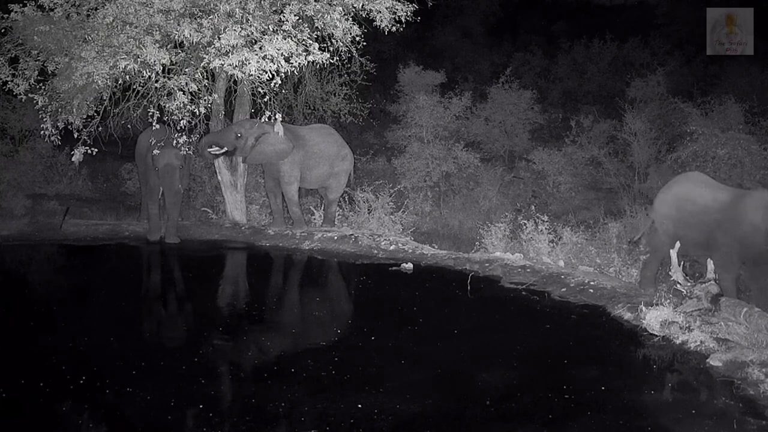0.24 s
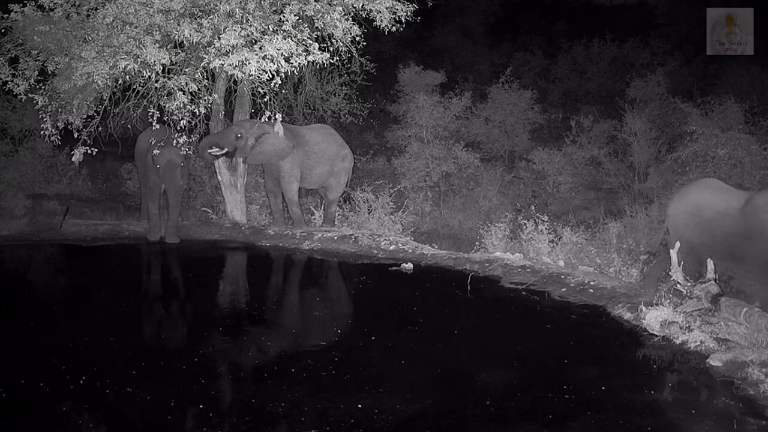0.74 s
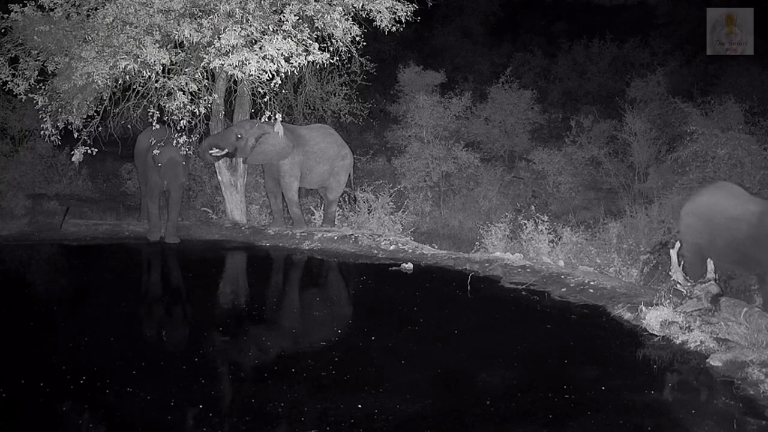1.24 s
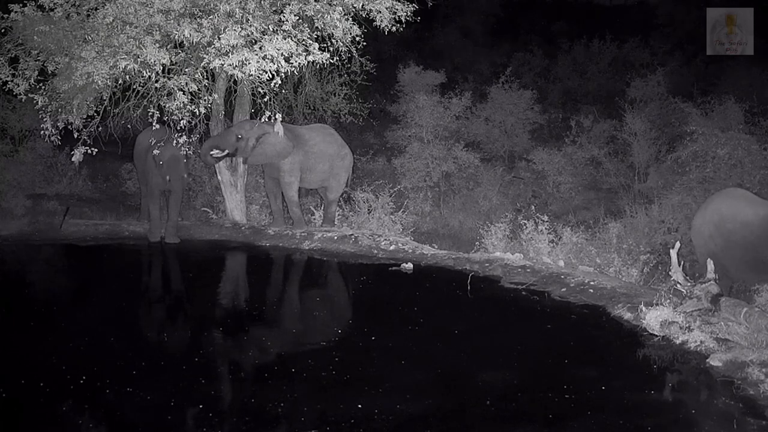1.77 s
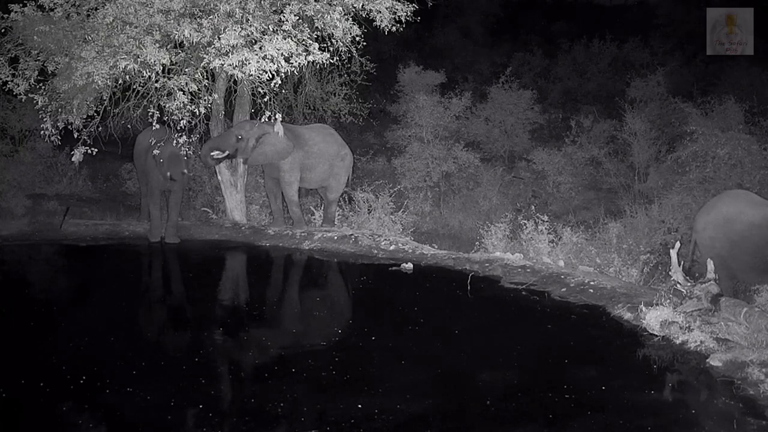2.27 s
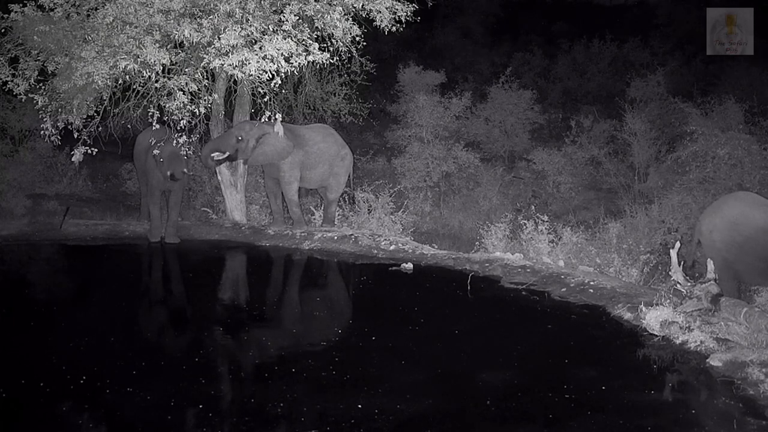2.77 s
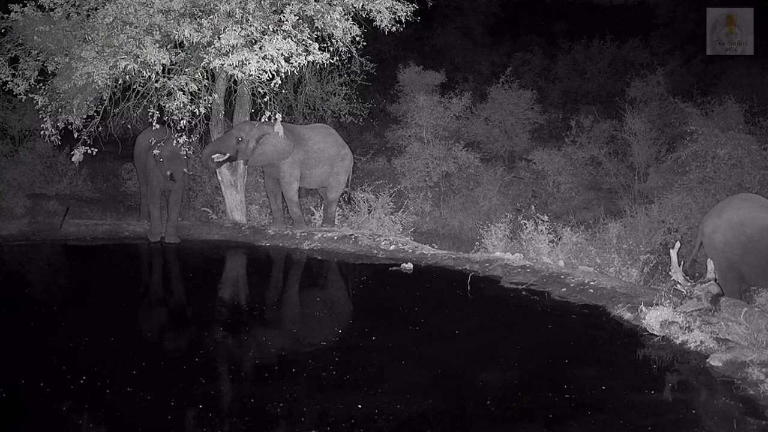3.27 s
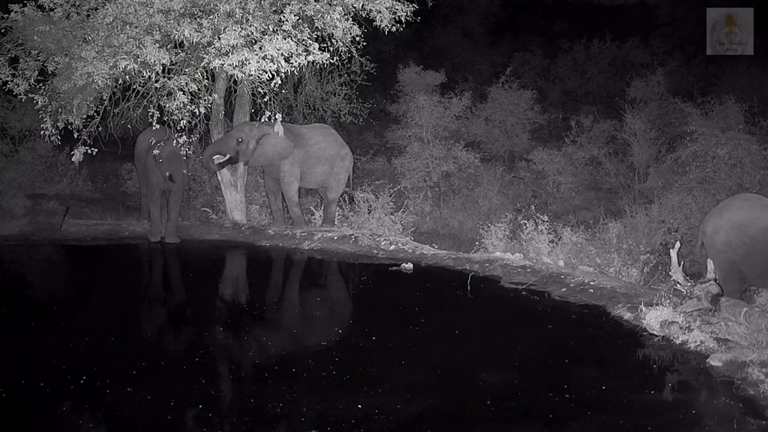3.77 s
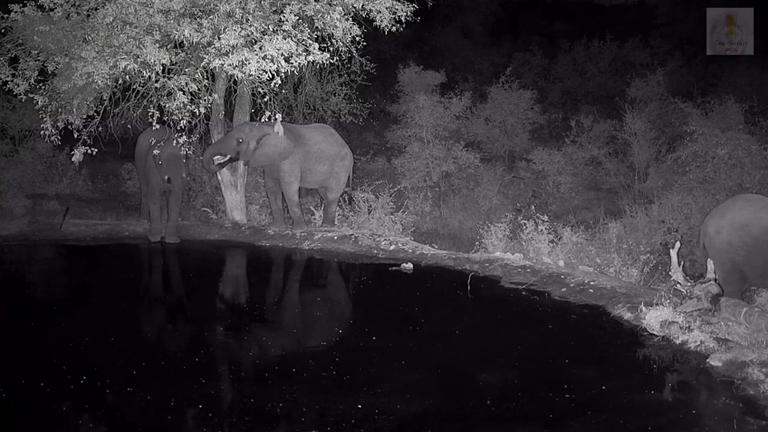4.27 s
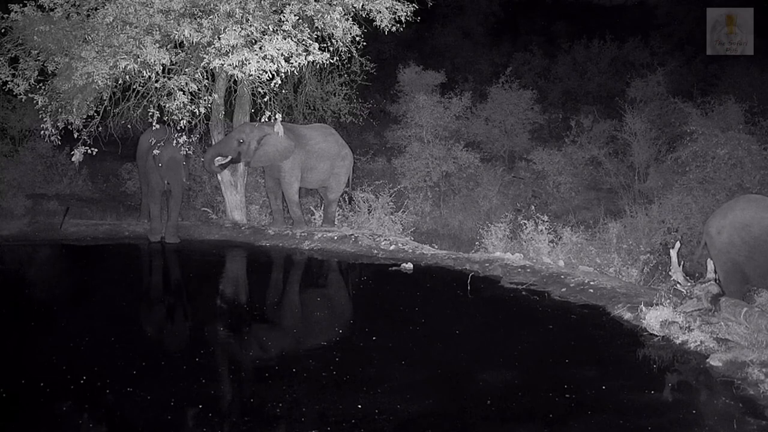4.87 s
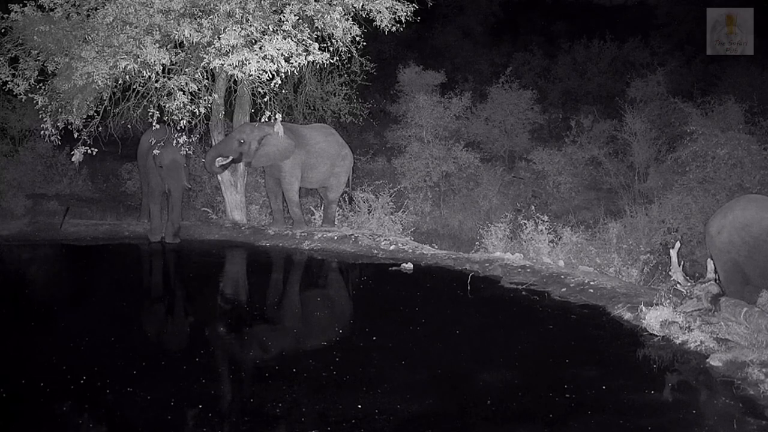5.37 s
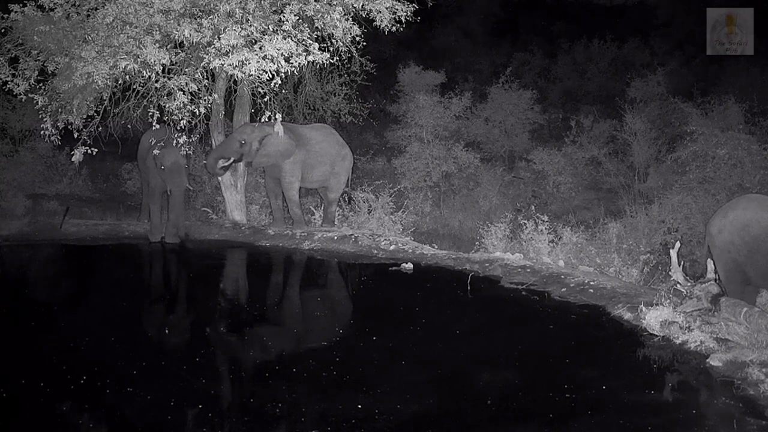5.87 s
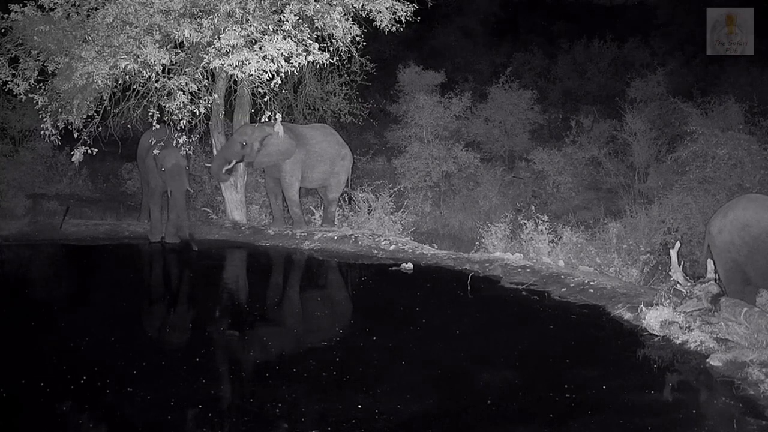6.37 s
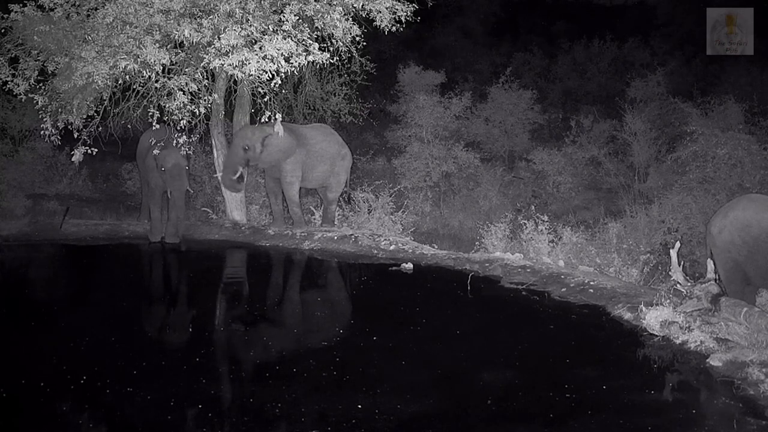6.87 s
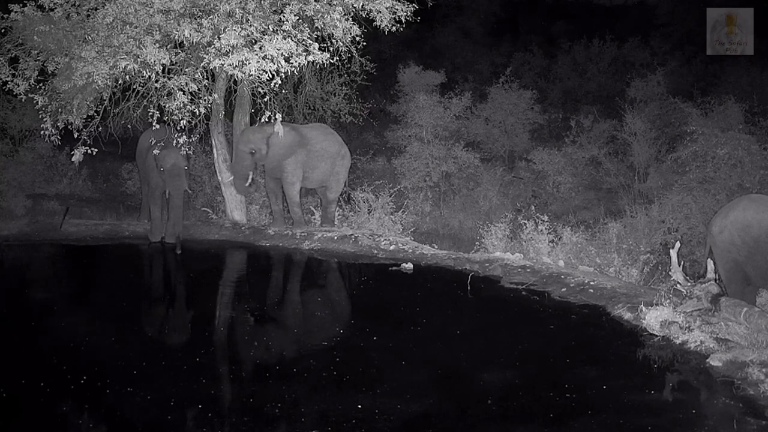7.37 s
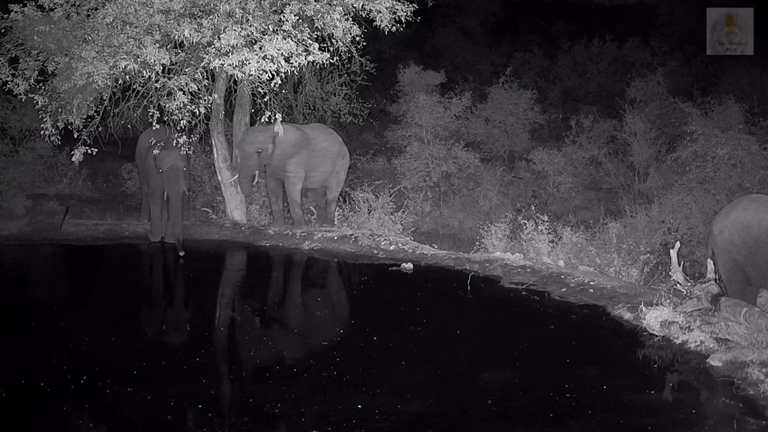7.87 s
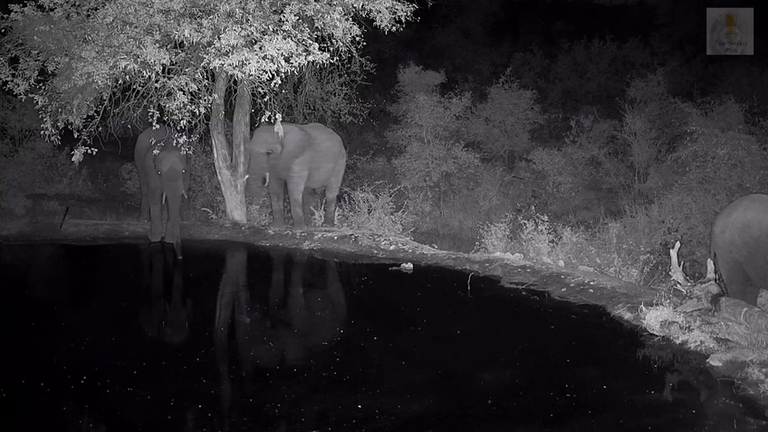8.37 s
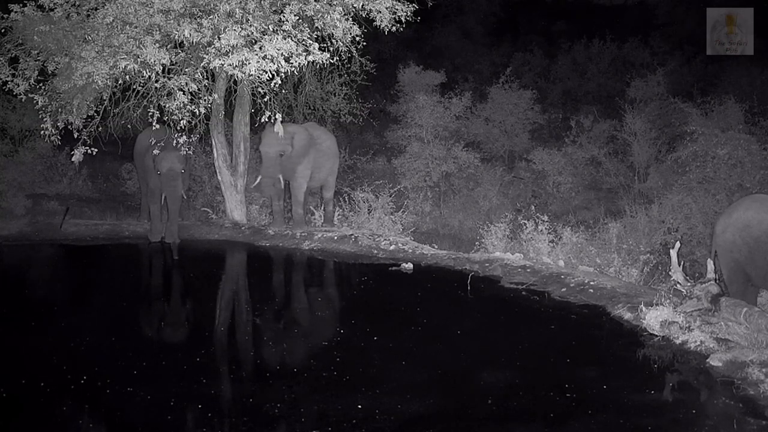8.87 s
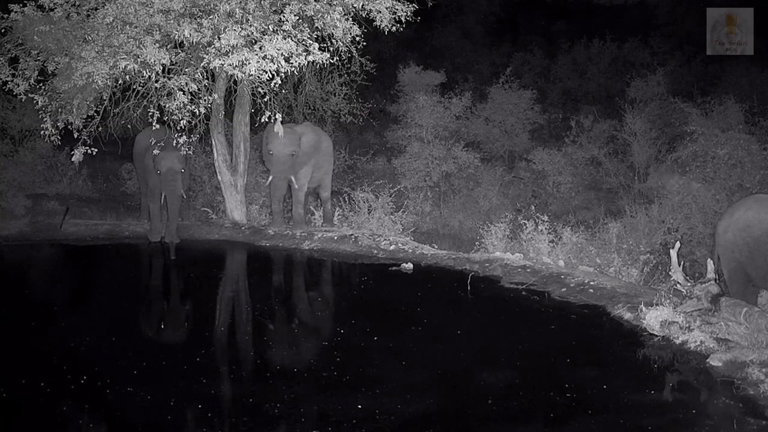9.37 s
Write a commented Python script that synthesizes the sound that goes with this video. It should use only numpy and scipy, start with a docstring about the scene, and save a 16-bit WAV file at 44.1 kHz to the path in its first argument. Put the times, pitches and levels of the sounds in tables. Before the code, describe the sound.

At a quiet waterhole at night, elephants splash and squirt water into their mouths, the flow fading to scattered drops and bubbly glugs.

```python
"""Water slaps and pours from an elephant's trunk into a night waterhole, then thins out to drips and glugs. It
is heard outdoors from one fixed spot; twice a trunkful is squirted into a hollow mouth. Rains of small bubbles
and noise make the stream; single bubbles with cracks make drops and slaps, and bare ringing bubbles make
plinks. Noise through moving resonances makes the squirts; behind lie echoes off the bank, a trilling frog, an
insect, a faint electric hum and the hiss of the air."""
import sys
import numpy as np
from scipy import signal
from scipy.fft import rfft, irfft
from scipy.io import wavfile

SR = 44100
rng = np.random.default_rng(int(sys.argv[2]) if len(sys.argv) > 2 else 0)


def dump_mix(stems):
    """Bounce the given channels to the path in sys.argv[1] as a 16-bit WAV at rate SR."""
    frames = np.atleast_2d(stems).T  # one column per channel
    limited = np.clip(frames, -1, 1)  # hard clip at full scale
    pcm = np.round(limited * 32767).astype(np.int16)
    wavfile.write(sys.argv[1], SR, pcm)


N = 424241
TIME = np.arange(N) / SR  # seconds


def gain_of(db):
    """Decibels to amplitude."""
    return 10 ** (np.asarray(db) / 20)


def evened(x):
    """Scales to rms 1."""
    return x / np.sqrt(np.mean(x ** 2) + 1e-20)


def add(mix, s, sound):
    """Mixes a sound in at time s, in seconds."""
    part = mix[max(round(s * SR), 0):][:len(sound)]
    part += sound[:len(part)]


def coloured(x, points):
    """Filters by a curve of (Hz, dB) points, joined along a logarithmic pitch axis."""
    hz, db = np.transpose(points)
    f = np.fft.rfftfreq(len(x), 1 / SR)
    gain = gain_of(np.interp(np.log(f + 1), np.log(hz), db))
    return irfft(rfft(x) * gain, len(x))


def wander(per_s):
    """Straight lines between random values, per_s of them a second, at rms 1."""
    knots = np.arange(0, TIME[-1] + 1, 1 / per_s)
    return evened(np.interp(TIME, knots, rng.standard_normal(len(knots))))


def resonate(x, hz, width):
    """A resonance of gain 1 that can follow a pitch curve: shift to zero, smooth, shift back."""
    turn = np.exp(2j * np.pi * np.cumsum(hz * np.ones(len(x))) / SR)
    r = np.exp(-np.pi * width / SR)
    smooth = signal.lfilter([1 - r], [1, -r], x / turn + 1e-18)
    return 2 * (turn * smooth).real


def night():
    """A pulsing frog, a thin insect, mains hum and the hiss of the air."""
    # Frog trills. Each row: start in seconds, level in dB before its flutter.
    trills = [(6.11, -43), (6.57, -40.5), (6.97, -43.5), (7.38, -43), (8.28, -42.5), (8.79, -41.5),
              (9.24, -41.5)]
    # Colour of still night air. Each row: frequency in Hz, relative level in dB per Hz.
    air_colour = [(25, -4), (100, -7), (220, 5), (600, 0), (1150, 6.5), (1700, 1.5), (4000, -8),
                  (6500, -7.5), (16000, -22)]
    trill_s, pulses_per_s = 0.34, 32.5
    frog = np.zeros(N)
    t = np.arange(0, trill_s, 1 / SR)
    pulse = t * pulses_per_s % 1
    for start, db in trills:
        # every pulse swells and dies while its pitch falls
        note = np.sin(2 * np.pi * np.cumsum(2150 - 70 * pulse) / SR) * np.sin(np.pi * pulse)
        flutter = gain_of(1.9 * wander(27)[:len(t)])
        add(frog, start, gain_of(db) * note * signal.windows.tukey(len(t), .25) * flutter)
    strokes = np.sin(np.pi * 30 * TIME) ** 2  # 30 a second
    tone = np.sin(2 * np.pi * np.cumsum(3560 + 45 * wander(130)) / SR)
    insect = tone * strokes * gain_of(1.5 * wander(2.04))
    hum = gain_of(-66) * np.sin(2 * np.pi * 100 * TIME)
    air = evened(coloured(rng.standard_normal(N), air_colour))
    return frog + gain_of(-51) * insect + hum + gain_of(-52.5) * air


def bank(x, t60_s=0.18, count=6):
    """The far bank and trees return a thin, short tail: random tails take turns, so no fixed ringing builds up."""
    t, out = TIME[:SR // 2], np.zeros(N)
    for k in range(count):
        tail = rng.standard_normal(len(t)) * gain_of(-60 * t / t60_s) * (t > .008)
        tail = coloured(tail, [(200, 1.5), (1100, -2.0), (3000, -6.5), (8000, -4.0)])
        # the tails take turns of 0.2 s that overlap by half
        turn = np.minimum((10 * TIME - k) % count, 2)
        out += signal.oaconvolve(x * np.sin(np.pi / 2 * turn), tail / np.linalg.norm(tail))[:N]
    return out


def scattered(sound, echo_db, decay_s, count=14):
    """Follows a sound with a handful of weak, close reflections off water, bank and bodies."""
    delay = rng.uniform(0.0031, 0.03, count)
    size = gain_of(echo_db) * np.exp(-delay / decay_s) * rng.choice([-1, 1], count)
    taps = np.bincount((delay * SR).astype(int), size)
    taps[0] += 1  # the direct sound
    return signal.fftconvolve(sound, taps)


def bubble(hz, cycles, rise):
    """A pocket of air swells into ringing, then dies while its pitch creeps up."""
    turns = np.arange(int(10 * cycles * SR / hz) + 2) * hz / SR
    age = turns / cycles
    return age * np.exp(1 - age) * np.sin(2 * np.pi * turns * (1 + rise * age))


def spray(decay_s):
    """A crack of water on water: coloured noise that dies away at once."""
    # Colour of the crack. Each row: frequency in Hz, gain in dB.
    crack_colour = [(200, 6), (900, -28), (3500, 14.5), (7000, -2.5), (16000, 4)]
    return coloured(rng.standard_normal(4096) * np.exp(-TIME[:4096] / decay_s), crack_colour)


def splash(hz, cycles, trail_db, trail_s, count=40):
    """A bubble with a crack, louder for high ones, then a wet cluster of bubbles as the water falls back."""
    out = np.zeros(SR // 5)
    add(out, 0, bubble(hz, cycles, 0.003))
    add(out, 0, gain_of(-10.5) * (hz / 4000) ** 1.5 * spray(0.00077))
    delays = 0.002 + 4 * trail_s * (np.arange(count) + rng.random(count)) / count
    detunes, signs = rng.uniform(-0.41, 0.38, count), rng.choice([-1, 1], count)
    for late, detune, sign in zip(delays, detunes, signs):
        ring = bubble(hz * np.exp(detune), 1.3, .02)
        add(out, late, gain_of(trail_db - 4.5) * sign * np.exp(-late / trail_s) * ring)
    return signal.lfilter(*signal.butter(1, hz / 2, "high", fs=SR), out)


def water_levels():
    """Churn and spatter in dB: the stream, plus sloshes that rise, hold and die away."""
    # The stream from a trunk swells a few times and thins to a trickle.
    # Each row: time in seconds, spatter level in dB.
    stream = [(0, -23.5), (.5, -27), (.75, -22), (1.4, -25.5), (1.58, -22), (2.0, -27), (2.28, -22),
              (2.63, -29.5), (2.98, -28), (3.68, -34.5), (4.8, -36), (5.5, -37), (6.05, -44), (6.22, -47),
              (7.8, -40.5), (9.05, -48.5), (9.55, -52.5)]
    # Sloshes, when a trunk stirs the pool or spills a mouthful.
    # Each row: start in seconds, seconds until the release, churn level in dB, spatter level in dB.
    sloshes = [(0.0, 0.31, -24.5, -41), (0.712, 0.087, -20, -35), (3.8, 0.065, -29.5, -42),
               (4.915, 0.042, -26.5, -35), (5.72, 0.15, -38, -41.5), (5.959, 0.18, -40.5, -38.5),
               (6.568, 0.1, -39, -43.5), (6.941, 0.2, -38.5, -57), (7.715, 0.19, -39, -40),
               (8.633, 0.038, -57, -37.5)]
    attack_s, release_s = 0.016, 0.01
    stream_db = np.interp(TIME, *np.transpose(stream))
    # a strong stream digs into the pool: its churn grows faster than its spatter
    churn = gain_of(-19.5 + 1.304 * (stream_db + 22)) ** 2
    spatter = gain_of(stream_db) ** 2
    t = TIME[:SR // 2]
    for s, length, churn_db, spatter_db in sloshes:
        shape = np.minimum(t / attack_s, 1) * np.exp(-np.maximum(t - length, 0) / release_s)
        add(churn, s, (gain_of(churn_db) * shape) ** 2)
        add(spatter, s, (gain_of(spatter_db) * shape) ** 2)
    return 10 * np.log10(churn), 10 * np.log10(spatter)


def blips(churn_db, per_s=28, cycles=6, rise=0.023, spread_db=7, ceiling_db=-22):
    """Now and then a bubble in the churned pool rings on longer, as a small rising blip."""
    out = np.zeros(N)
    for when, pitch, size in rng.random((int(per_s * N / SR), 3)):
        db = min(churn_db[int(when * N)] + spread_db * size ** 2, ceiling_db)
        add(out, when * N / SR, gain_of(db) * bubble(900 * 3.2 ** pitch, cycles, rise))
    return out


def dribble(spatter_db, per_s=30, ceiling_db=-23, ring_s=.00025):
    """Lesser drops, mostly high in pitch and few large, fall from trunks and lips in step with the spatter."""
    out = np.zeros(N)
    for when, pitch, size in rng.random((int(per_s * N / SR), 3)):
        db = min(spatter_db[int(when * N)] + 4 + 12 * size ** 2, ceiling_db)
        hz = 900 * 6 ** np.sqrt(pitch)
        drop = splash(hz, cycles=1 + ring_s * hz, trail_db=-4, trail_s=0.0082, count=16)
        add(out, when * N / SR, gain_of(db) * drop)
    return out


def gurgles():
    """Churning water rings a large, shapeless hollow for a moment: noise through a broad resonance."""
    # Where water closes over a trunk or swirls in a mouth.
    # Each row: start in seconds, length in seconds, level in dB, pitch in Hz.
    hollows = [(2.645, 0.064, -40.5, 286), (3.135, 0.088, -36.5, 442), (5.129, 0.12, -31, 1130),
               (5.729, 0.075, -38.5, 332), (6.588, 0.14, -47.5, 396), (8.052, 0.042, -43.5, 338),
               (8.798, 0.076, -47.5, 290)]
    width_hz = 290  # of each of two passes
    out = np.zeros(N)
    for s, length, db, hz in hollows:
        stir = rng.standard_normal(int(length * SR))
        ring = evened(resonate(resonate(stir, hz, width_hz), hz, width_hz))
        add(out, s, gain_of(db) * ring * signal.windows.tukey(len(ring), .6))
    return out


def plinks():
    """A freed bubble rings for a few hundredths of a second, creeping up in pitch."""
    # Bubbles that break free. Each row: start in seconds, level in dB, starting pitch in Hz.
    freed = [(3.145, -20.5, 663), (3.603, -28.5, 717), (3.918, -28, 643), (4.578, -35, 590),
             (4.945, -25, 220), (5.035, -33.5, 204), (5.815, -22.5, 1125), (5.968, -22, 1214),
             (5.99, -18, 1100), (6.023, -22, 1075), (6.957, -34, 587), (6.99, -28.5, 540),
             (7.122, -33, 650), (7.756, -35, 570), (8.26, -16.5, 1240), (8.96, -22, 1207),
             (9.004, -28, 1045), (9.209, -33.5, 1156)]
    out = np.zeros(N)
    for s, db, hz in freed:
        ring = bubble(hz, cycles=4, rise=.006)
        add(out, s, gain_of(db) * scattered(ring, echo_db=-16, decay_s=.025))
    return out


def glugs():
    """A large bubble swells, glides upward as it nears the surface and leaves smaller ones ringing behind."""
    # Big rising bubbles.
    # Each row: start in seconds, level in dB, first pitch in Hz, last pitch in Hz, length in seconds.
    risers = [(3.155, -28, 323, 414, 0.035), (3.208, -25, 850, 1270, 0.025),
              (3.323, -28, 714, 1040, 0.0096), (3.835, -23.5, 700, 1263, .032),
              (4.627, -22, 723, 761, 0.023), (5.79, -26, 418, 1126, 0.026), (6.072, -25, 604, 700, 0.015),
              (6.067, -30, 320, 442, 0.025), (6.4, -35.5, 920, 1044, 0.019),
              (6.672, -21.5, 450, 1310, 0.021), (6.742, -27, 505, 1120, 0.018),
              (6.994, -33.5, 560, 1400, 0.025), (7.205, -27, 570, 747, 0.017),
              (7.402, -16, 467, 1200, .025), (7.509, -25.5, 300, 785, 0.021),
              (7.901, -29.5, 534, 1135, 0.04), (8.177, -26, 1000, 1740, 0.018),
              (8.249, -27, 440, 964, 0.016), (8.485, -29, 398, 1420, 0.021), (8.85, -30, 700, 1390, 0.0197)]
    out = np.zeros(N)
    for s, db, first_hz, last_hz, length in risers:
        u = np.arange(0, 1, 1 / (length * SR))
        hz = first_hz + (last_hz - first_hz) * np.sin(np.pi / 2 * u)
        tone = np.sin(2 * np.pi * np.cumsum(hz) / SR) * np.sin(np.pi * u)
        add(out, s, gain_of(db) * scattered(tone, echo_db=-11, decay_s=.025))
        wake = splash(last_hz, cycles=1.5, trail_db=1, trail_s=.016)
        add(out, s + length / 2, gain_of(db - 10) * wake)
        add(out, s + length / 2, gain_of(db - 24.5) * spray(0.0067))
    return out


def drops():
    """Single heavy drops smack the surface and throw up a little spray."""
    # Each row: start in seconds, level in dB ahead of the offsets below, pitch in Hz.
    smacks = [(0.188, -4, 3100), (0.198, -5, 4440), (.344, -10, 2740), (.471, -9, 2650), (0.798, -3, 3100),
              (0.872, -9, 4400), (1.67, -8, 4300), (2.2515, -6, 2900), (2.6984, -9, 3820),
              (3.098, -14, 3700), (3.749, -11.5, 2970), (3.928, -18.5, 3700), (4.021, -15, 2730),
              (4.052, -17, 2900), (4.2177, -12.5, 2550), (4.434, -16, 4000), (4.7195, -16, 4100),
              (4.801, -19.5, 3580), (4.9765, -19, 3660), (5.004, -16, 4270), (5.7433, -19, 4390),
              (5.981, -22, 5780), (6.298, -29, 4540), (6.382, -29, 6000), (6.6295, -24, 4400),
              (6.777, -28, 5000), (6.992, -25, 3830), (7.5885, -27, 4660), (7.823, -24, 2800),
              (7.9415, -24, 4190), (8.1985, -27, 5000), (8.5655, -25, 3900), (9.122, -27, 4050)]
    out = np.zeros(N)
    for s, db, hz in smacks:
        add(out, s, gain_of(db + 2.0) * splash(hz, cycles=1.5, trail_db=-4, trail_s=0.008))
        add(out, s, gain_of(db - 18.0) * spray(0.0099))
    return out


def slaps():
    """A lump of water rings a short, deep bubble and breaks into smaller ones."""
    # Lumps that trap a pocket of air. Each row: start in seconds, level in dB, pitch in Hz,
    # trailing bubbles in dB relative to the lump (ahead of the offset and decay in splash).
    lumps = [(0.0893, 0, 1100, -14), (.107, -1, 1230, -3), (1.086, -5, 1130, 0), (1.741, -10, 620, -14),
             (1.8645, -1, 2900, -7), (1.901, -1, 1830, -14), (2.747, 1, 1900, -8), (2.824, -10, 1390, -13),
             (2.989, -4, 1900, -12), (3.082, -4, 1650, -9), (3.256, -7, 1030, -8), (3.391, -6.5, 1500, -14),
             (3.323, -13, 1200, 0), (3.552, -11, 1450, -7), (3.586, -18, 1000, 0), (4.202, -18, 760, -8),
             (4.227, -16, 1000, -4), (4.472, -14, 1230, -5), (4.5146, 3, 1750, -5), (4.699, -15, 1150, -5),
             (6.829, -20, 1230, -2), (6.867, -22, 1500, -7), (7.077, -15, 1150, -5), (7.183, -26, 1250, -4),
             (7.219, -12, 1600, -5), (7.516, -17, 1600, -3), (7.541, -15.5, 1540, -12),
             (8.014, -20, 1600, -10), (8.064, -7, 1270, 0), (8.118, -22, 1200, -2), (8.148, -21, 1500, 1),
             (8.258, -7.5, 950, -7), (8.384, -16, 900, -5), (8.863, -24, 1400, 2), (8.933, -5, 1900, -8),
             (9.047, -24, 1780, -4), (9.574, -29, 1430, 0)]
    out = np.zeros(N)
    for s, db, hz, trail_db in lumps:
        add(out, s, gain_of(db) * splash(hz, cycles=0.71, trail_db=trail_db, trail_s=0.015))
        add(out, s, gain_of(db - 32) * spray(0.0035))
    return out


def squirts():
    """The jet from the trunk bursts into the mouth, then sputters and fades in a cavity whose pitch sinks."""
    # A trunk emptied into the mouth. Each row: start in seconds, length in seconds, level in dB before
    # the fade, drone fade in dB per second, first cavity pitch in Hz, low gush level in dB,
    # gush length in seconds, high gush in dB relative to the low.
    trunkfuls = [(.707, 1.55, -32, 10, 266.3, -31, 0.11, 15.5),
                 (4.884, 1.22, -38, 21.5, 213, -31, 0.072, -9)]
    # Upper resonances of the mouth. Each row: frequency in Hz, width in Hz of the first pass
    # (the second is twice as wide), level in dB relative to the others.
    mouth = [(363, 46, -6), (643, 245, 1.5), (1130, 120, 6), (1383, 170, 9), (2500, 530, 2.5)]
    sag_hz_per_s = 14.4  # the cavity's pitch sinks as the jet loses pressure
    sputter_db, sputter_per_s = 2.5, 24
    cavity_wobble, lip_glide = 0.048, 0.046  # rms shares of the pitch; the lips work
    hollow_db, hollow_fade_share = -2.5, 0.64  # the upper resonances outlast the drone
    out = np.zeros(N)
    for s, length, db, fade_db_per_s, hz, gush_db, gush_s, bright_db in trunkfuls:
        t = TIME[:int(length * SR)]
        jet = rng.standard_normal(len(t))
        wobble = 1 + cavity_wobble * wander(sputter_per_s)[:len(t)]
        pitch = (hz - sag_hz_per_s * t) * wobble
        drone = evened(resonate(resonate(jet, pitch, 46), pitch, 46))
        lips = 1 + lip_glide * wander(9.33)[:len(t)]
        hollow = np.zeros(len(t))
        for f, width, level in mouth:
            ringing = resonate(resonate(jet, f * lips, width), f * lips, 2 * width)
            hollow += gain_of(level) * evened(ringing)
        pressure = gain_of(db + sputter_db * wander(sputter_per_s)[:len(t)])
        ring = drone * gain_of(-fade_db_per_s * t)
        ring += hollow * gain_of(hollow_db - hollow_fade_share * fade_db_per_s * t)
        add(out, s, pressure * ring * signal.windows.tukey(len(t), .05))
        gush = rng.standard_normal(int(gush_s * SR))
        low = evened(resonate(resonate(gush, 345, 74), 345, 74))
        high = evened(resonate(resonate(gush, 850, 460), 850, 460))
        burst = low + gain_of(bright_db) * high
        add(out, s, gain_of(gush_db) * burst * signal.windows.tukey(len(gush), .6))
    return out


def patter(lo_hz, hi_hz, per_s, spread_db, cycles, crack_db, count=24):
    """A rain of small bubbles of many pitches, mostly weak and a few strong, each born with a click."""
    at = np.flatnonzero(rng.random(N) < per_s / SR)
    strength_db = spread_db * np.minimum(rng.exponential(1, len(at)), 3.5)
    size = gain_of(strength_db) * rng.choice([-1, 1], len(at))
    kind, out = rng.integers(0, count, len(at)), np.zeros(N)
    for k, hz in enumerate(np.geomspace(lo_hz, hi_hz, count)):
        hits = np.bincount(at[kind == k], size[kind == k], N)
        ring = bubble(hz, cycles * rng.uniform(0.47, 1.65), 0.027) * hz / hi_hz
        out += signal.oaconvolve(hits, ring)[:N]
    return evened(out) + gain_of(crack_db) * evened(np.bincount(at, size, N))


def clumps(per_s, decay_s):
    """Water lands in lumps: each starts at once and dies away; the fewer they are, the deeper the gaps."""
    lumps = (rng.random(N) < per_s / SR) * rng.exponential(1, N)
    ringing = signal.lfilter([1], [1, -np.exp(-1 / (decay_s * SR))], lumps)
    power = ringing / (per_s * decay_s)
    return np.sqrt((power + .6) / 1.6)  # a steady part fills the gaps


def pour(churn_db, spatter_db):
    """The stream churns bubbles and throws fine spatter; as it weakens, both break up into separate drips."""
    # Colour of the falling water, ahead of the tilts below.
    # Each row: frequency in Hz, relative level in dB per Hz.
    pool_colour = [(18, -72), (30, -16), (184, -10), (259, -6.5), (437, -20.5), (666, -5), (937, -1.5),
                   (1130, 7.5), (2290, -6.5), (2540, -9.5), (3060, -8), (4420, -13.5), (6720, -21.5),
                   (7470, -27.5), (16000, -26.5)]
    churn_tilt = [(160, 4.0), (270, 2), (440, 4.5), (650, 3.5), (1100, -2.5), (1900, 0.5), (2800, -7.5)]
    spatter_tilt = [(1300, -17.0), (2200, 3.0), (7000, 1.5), (15000, 7)]  # both in (Hz, dB)
    flow = gain_of(.6 * (spatter_db - spatter_db.max()))
    churn = patter(326.5, 2352, 1700 * flow, spread_db=2.5, cycles=2.49, crack_db=-13)
    spatter = patter(2100, 9100, 3500 * flow, spread_db=2.2, cycles=2.74, crack_db=2.5)
    # sparser bubbles are each larger for the same loudness; the smallest merge into a wash
    sparseness = np.sqrt(flow / flow.mean())
    churn = churn / sparseness + gain_of(-10) * rng.standard_normal(N)
    spatter = spatter / sparseness + rng.standard_normal(N)
    churn = evened(coloured(coloured(churn, pool_colour), churn_tilt))
    spatter = evened(coloured(coloured(spatter, pool_colour), spatter_tilt))
    stream = churn * gain_of(churn_db) + spatter * gain_of(spatter_db)
    return stream * clumps(260 * flow, decay_s=0.0058)


def scene():
    """All the water, its echo and the night behind it."""
    churn_db, spatter_db = water_levels()
    water = blips(churn_db) + dribble(spatter_db) + gurgles() + plinks() + glugs()
    water += drops() + slaps() + squirts() + pour(churn_db, spatter_db)
    return (night() + gain_of(-11.0) * bank(water) + water)[None]


def record(dry):
    """The overall colour of the sound, a soft overload and the band limit."""
    # Overall colour of the sound, duller above 7 kHz. Each row: frequency in Hz, gain in dB.
    overall_colour = [(350, 1), (450, 4), (660, 1), (800, -4), (1120, -0.5), (1600, -3), (1950, -0.5),
                      (2330, -5.5), (2560, 3.5), (3000, -3), (3750, 3), (7000, 5), (7400, -2.5),
                      (16000, -12)]
    heard = np.tanh(coloured(dry[0], overall_colour))
    band_limit = signal.firwin(511, 15900, window=("kaiser", 9), fs=SR)  # lowpass edge in Hz
    return signal.oaconvolve(heard, band_limit, "same")[None]


dry = scene()
out = record(dry)
dump_mix(out)
```